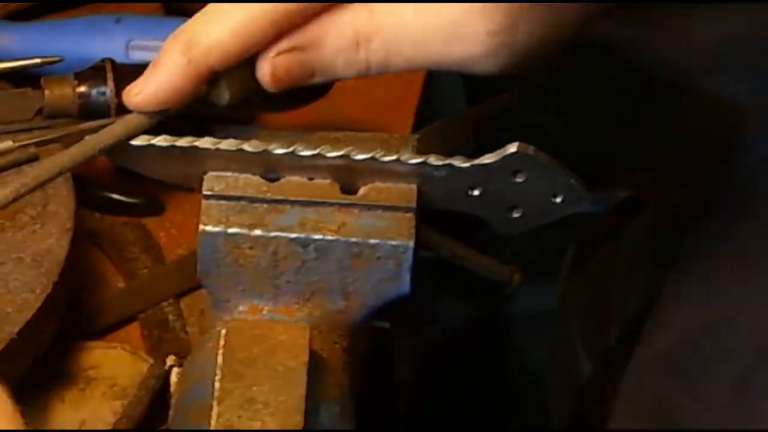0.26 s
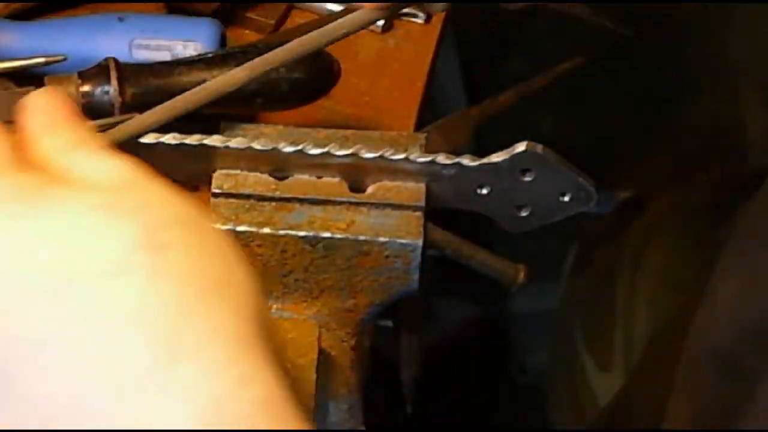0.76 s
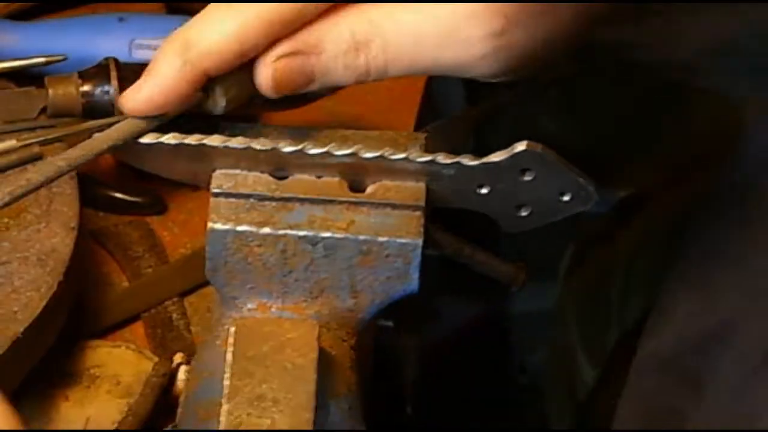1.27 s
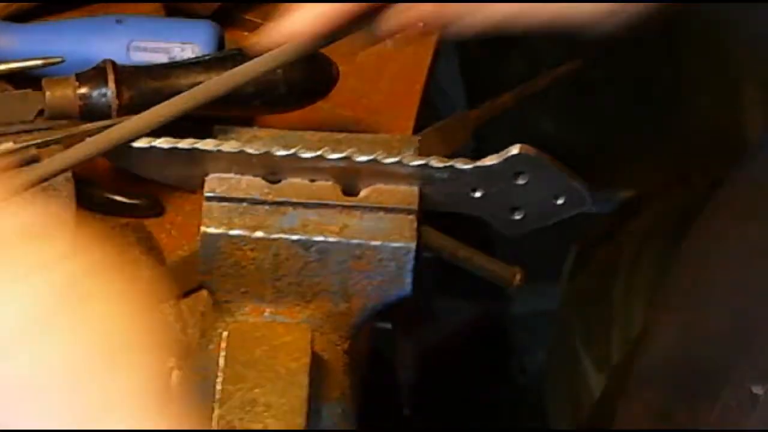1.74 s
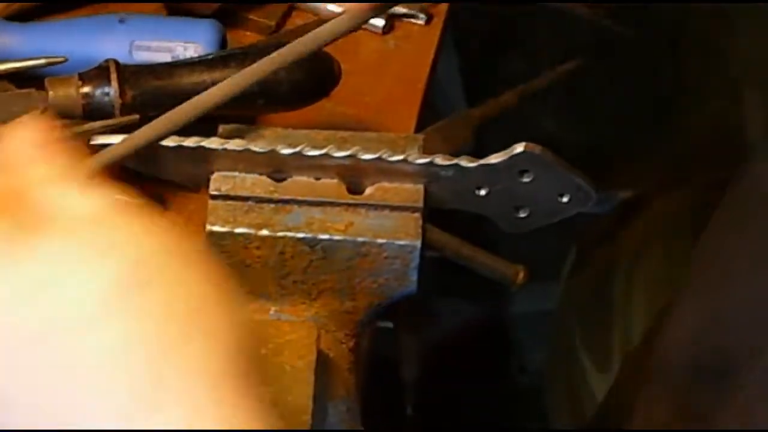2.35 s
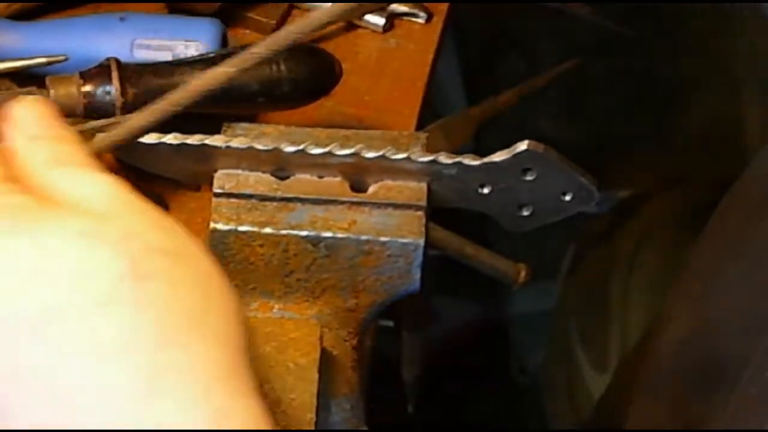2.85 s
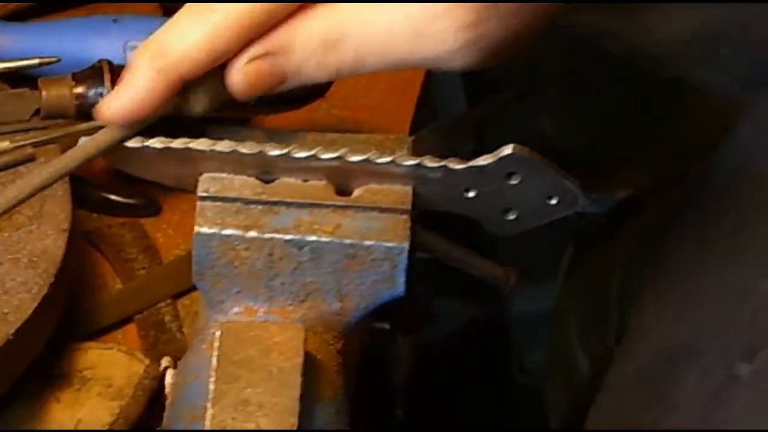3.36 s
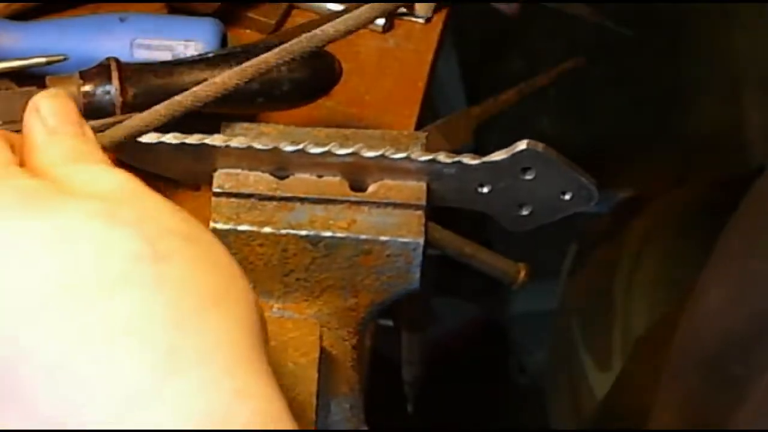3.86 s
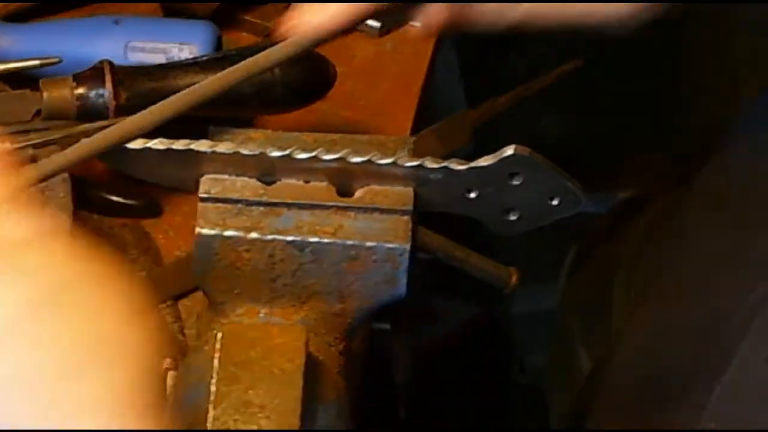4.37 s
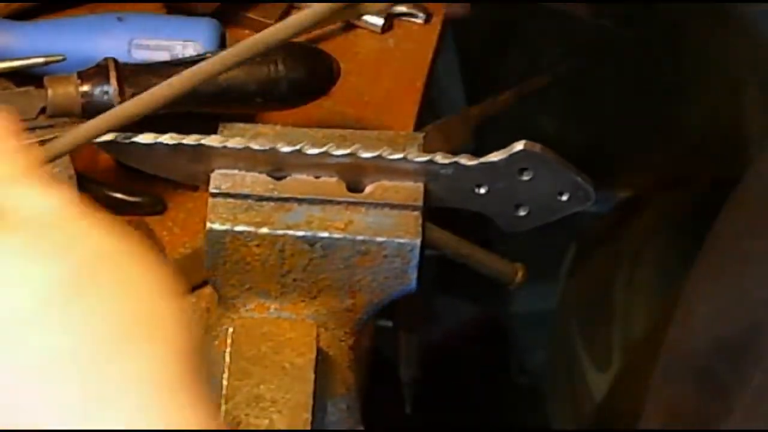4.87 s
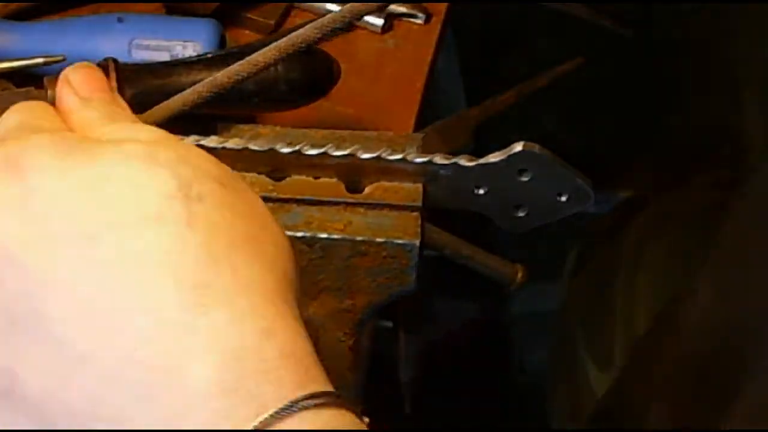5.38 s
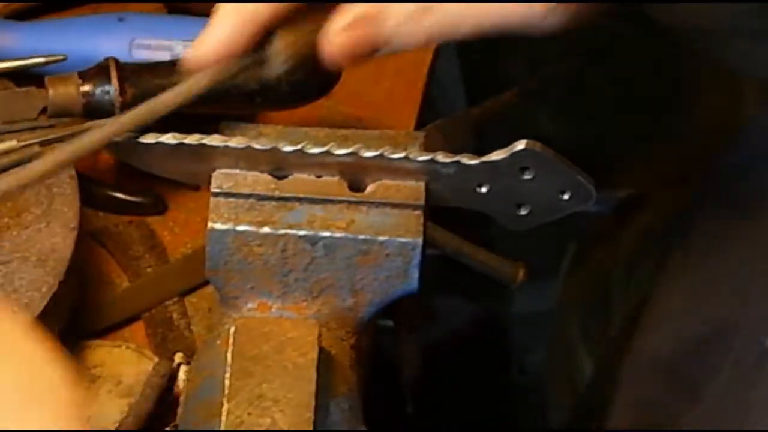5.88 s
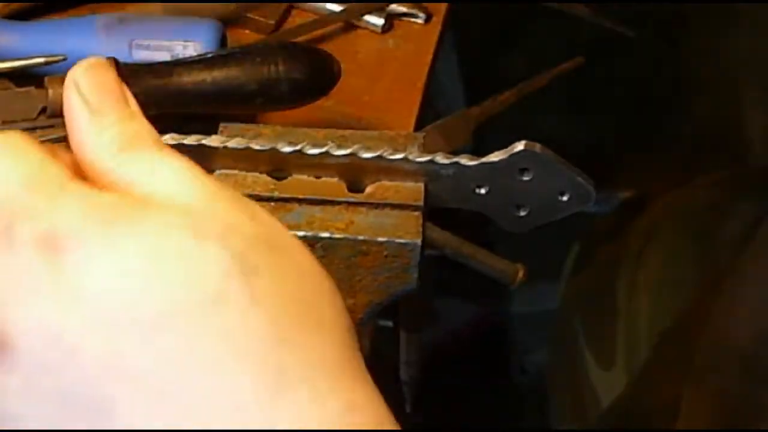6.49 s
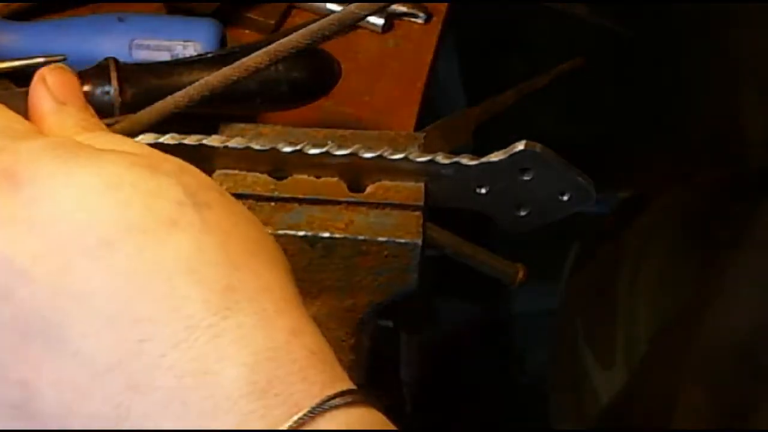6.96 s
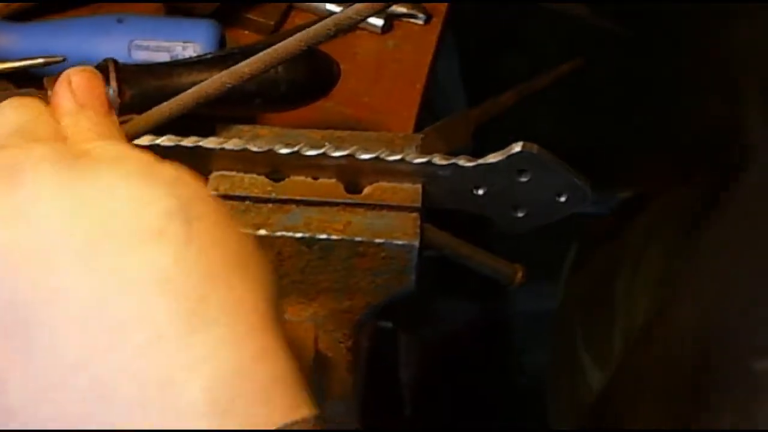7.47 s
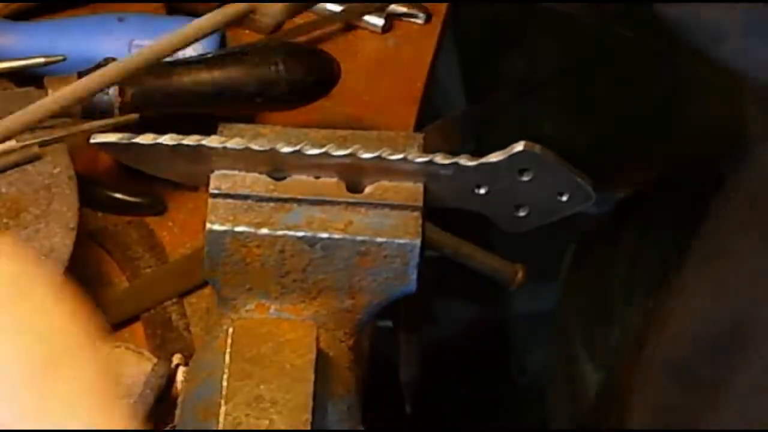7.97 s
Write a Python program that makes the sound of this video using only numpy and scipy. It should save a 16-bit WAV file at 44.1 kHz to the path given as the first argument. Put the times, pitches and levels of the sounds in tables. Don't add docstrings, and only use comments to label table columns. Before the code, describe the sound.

Gritty metal filing in a small workshop, hard cutting scrapes and lighter returns, faint taps between, then a clacking double knock and more rasping.

```python
import sys
import numpy as np
from scipy import signal
from scipy.fft import rfft, irfft, next_fast_len
from scipy.io import wavfile

SR = 44100
rng = np.random.default_rng(int(sys.argv[2]) if len(sys.argv) > 2 else 0)


def elevation(decibels):
    levels = np.asarray(decibels, float)
    return 10 ** (levels / 20)


def unload_audio(sound):
    columns = np.transpose(np.atleast_2d(sound))
    steps = np.round(np.clip(columns, -1, 1) * 32767)
    wavfile.write(sys.argv[1], SR, steps.astype(np.int16))


N = 362943


def rms_one(x):
    return x / np.sqrt(np.mean(x ** 2) + 1e-20)


def drift(rate_hz):
    r = np.exp(-80 * np.pi * rate_hz / SR)
    noise = rng.standard_normal(N // 40 + 1002)
    slow = signal.lfilter([1], [1, -2 * r, r * r], noise)[1000:]
    return np.interp(np.arange(N) / 40, np.arange(len(slow)), rms_one(slow))


def resonate(x, hz, width_hz):
    r = np.exp(-np.pi * width_hz / SR)
    poles = [1, -2 * r * np.cos(2 * np.pi * hz / SR), r * r]
    return signal.lfilter(np.array([1, 0, -1]) * (1 - r * r) / 2, poles, x)


def ring(clicks, hz, t60_s):
    r, w = elevation(-60 / (t60_s * SR)), 2 * np.pi * hz / SR
    return signal.lfilter([0, np.sin(w)], [1, -2 * r * np.cos(w), r * r], clicks + 1e-18)


def clicks_at(times_s, sizes):
    out = np.zeros(N)
    out[(np.asarray(times_s) * SR).astype(int)] = sizes
    return out


# (frequency [Hz], width [Hz], level [dB rms])
HUM = [(33, 13, -52), (51.95, 2.87, -51), (93.3, 27, -69.5), (145, 9.9, -70.5)]
# (frequency [Hz], density [dB per Hz])
AIR = [(12, -11), (70, -18.5), (170, -32.5), (400, -34.5), (800, -37), (1400, -44), (2400, -44.5),
       (3900, -46)]
AIR_DB = -55.5
CONVERTER_RATE_HZ = 8000


def background():
    hum = 0
    for hz, width_hz, db in HUM:
        noise = rng.standard_normal(N + SR)
        band = resonate(resonate(noise, hz, width_hz), hz, width_hz)
        hum = hum + elevation(db) * rms_one(band[SR:])
    hz = np.fft.rfftfreq(N, 1 / SR) + 1
    air_hz, air_db = np.transpose(AIR)
    colour = elevation(np.interp(np.log(hz), np.log(air_hz), air_db)) * (hz < CONVERTER_RATE_HZ / 2)
    air = irfft(rfft(rng.standard_normal(N)) * colour, N)
    return hum + elevation(AIR_DB) * rms_one(air)


# (bite [s], swell [s], fade [s], blade level [dB], bench re blade [dB])
PUSHES = [
    (-0.1, 0.077, 0.19, -29.5, -5),
    (0.815, 0.11, 0.17, -32, -2),
    (1.51, 0.083, 0.14, -31, -5.5),
    (2.97, 0.16, 0.15, -30.5, -4.5),
    (4.07, .21, 0.16, -31, -1.5),
    (5.27, .18, 0.15, -32, -2.5),
    (7.3, 0.15, 0.18, -31.5, -2),
]
# (bite [s], swell [s], fade [s], blade level [dB], shank re blade [dB])
PULLS = [
    (0.25, 0.21, 0.3, -40.5, -2),
    (1.14, 0.074, 0.23, -34.5, -2.5),
    (1.78, 0.076, 0.21, -34.5, -1.5),
    (2.11, 0.08, 0.14, -37, -4),
]
# (touch [s], swell [s], fade [s], blade level [dB], file re blade [dB])
DRAGS = [(1.32, 0.025, 0.1, -43, -3.5), (1.97, 0.034, .09, -49, -13), (2.3, 0.11, 0.18, -56.5, -10),
         (2.54, 0.035, 0.067, -62, -22), (2.67, 0.099, 0.11, -50, -10.5), (3.29, 0.036, 0.11, -42, -11),
         (3.47, 0.03, 0.18, -56, -8), (3.66, 0.17, 0.13, -48.5, -15), (4.4, 0.093, 0.1, -48, -11.5),
         (4.64, 0.037, 0.065, -63.5, -2.5), (4.82, 0.069, 0.11, -58, -10), (5.09, 0.021, 0.04, -61, -24),
         (5.65, 0.052, 0.1, -47.5, -12), (5.76, 0.11, 0.082, -55, -12), (6.53, 0.028, .05, -62, -2),
         (6.62, .07, 0.14, -53.5, -18), (6.85, 0.052, 0.16, -63, -9), (7.62, 0.045, .17, -55, -7),
         (7.8, 0.089, 0.088, -56.5, -7), (8.012, 0.058, 0.15, -48.5, -11),
         (8.11, 0.034, 0.071, -47.5, -5.5)]
PUSH = dict(drop_bite_db=20.5, drop_fade_db=18.5, bench_db=-2, shank_db=-17, hiss_db=-14.5, pressure=0.68, law=2)
PULL = dict(drop_bite_db=10, drop_fade_db=24.5, bench_db=-6.5, shank_db=-1.5, hiss_db=-13, pressure=1, law=1.57)
DRAG = dict(drop_bite_db=11.5, drop_fade_db=20, bench_db=-11, shank_db=0, hiss_db=-1, pressure=0.76, law=1.34)
LANDING_DB_PER_S = 499


def contacts(follows, lag_s, share):
    t, power = np.arange(0, N + 64, 64) / SR, 1e-12
    for rows, kind in ((PUSHES, PUSH), (PULLS, PULL), (DRAGS, DRAG)):
        law = kind["law"]
        for start_s, swell_s, fade_s, db, row_db in rows:
            late_s = t - lag_s - start_s - swell_s
            rise, fall = kind["drop_bite_db"] / swell_s ** law, kind["drop_fade_db"] / fade_s ** law
            down_db = np.where(late_s < 0, rise, fall) * np.abs(late_s) ** law
            aloft_db = LANDING_DB_PER_S * np.maximum(start_s - t, 0)
            power = power + elevation(2 * (db - follows * down_db - aloft_db)) * share(kind, row_db)
    return np.interp(np.arange(N) / 64, np.arange(len(t)), power)


def teeth(per_s, spread_db, judder_db):
    sizes = elevation(spread_db * np.minimum(rng.exponential(1, N), 4)) * rng.choice([-1, 1], N)
    return sizes * (rng.random(N) < per_s / SR) * elevation(judder_db * drift(90.0))


def body(force, modes, wander_db):
    out = 0
    for k, (hz, width_hz, db) in enumerate(modes):
        push = force * elevation(wander_db * drift(7.7))
        out = out + (-1) ** k * elevation(db) * resonate(push, hz, width_hz)
    return rms_one(out)


BENCH = [(96.6, 24, -3.5), (152.1, 29.2, 0), (231, 20, -4), (273.5, 51, -8.5), (400.8, 23, -7.5)]
BLADE = [(506.3, 65, -3.5), (595, 32, -5), (667, 43, -10), (765.5, 19, 4.5), (911, 20, -26.5),
         (1028, 34.3, 1), (1150, 50, -21.5), (1303, 7.2, -4.5), (790, 460, -6.5)]
BLADE_FREE = [(799.3, 76, 2), (887, 48, -4.5), (1039, 120, -17.5), (610, 130, -3.5)]
FILE_BODY = [(1795, 58, -9), (1760, 80, 0.5), (1917, 51, 2.5), (2050, 15, -14.5), (2183, 11, 2),
             (2110, 910, -4)]
FILE_SING = [(1806, 190, 0), (1897, 77, 2.5)]
TOOTH_HISS = [(2498, 31, 9.5), (2655, 52, 3.5), (3052, 160, 8), (3484, 360, -0.5), (3844, 54, -2.5),
              (2870, 820, -4)]
FILE_TIP = [(2497, 160, 2.5), (2776, 37, 0), (2930, 240, -5)]
BENCH_FOLLOWS, TEETH_FOLLOW, SING_FOLLOWS = 0.77, 1.01, 1.65
BENCH_LAG_S, SING_LAG_S = 0.012, 0.034
TEETH_LEAD_S = 0.015
FREEING = 1.2
CHATTER_DB = 5


def scrape():
    def bench_share(kind, row_db):
        return elevation(2 * (kind["bench_db"] + row_db * (kind is PUSH)))

    def singing_share(kind, row_db):
        return elevation(2 * (kind["shank_db"] + row_db)) * (kind is PULL)

    def shank_share(kind, row_db):
        return elevation(2 * (kind["shank_db"] + row_db * (kind is DRAG))) * (kind is not PULL)

    def hiss_share(kind, row_db):
        return elevation(2 * (kind["hiss_db"] + row_db * (kind is DRAG)))

    level = contacts(1, 0, lambda kind, row_db: 1)
    freed = contacts(FREEING, 0, lambda kind, row_db: 1 - kind["pressure"])
    pressure = np.clip(1 - freed / level, 0, 1)
    hard = np.clip((10 * np.log10(level) + 54) / 14, 0.3, 1)
    bench_gain = np.sqrt(contacts(BENCH_FOLLOWS, BENCH_LAG_S, bench_share))
    singing = contacts(SING_FOLLOWS, SING_LAG_S, singing_share)
    shank_gain = np.sqrt(singing + contacts(TEETH_FOLLOW, -TEETH_LEAD_S, shank_share))
    hiss_gain = np.sqrt(contacts(TEETH_FOLLOW, -TEETH_LEAD_S, hiss_share))

    force = teeth(per_s=3000.0, spread_db=2.5, judder_db=1.2)
    force = force * elevation(CHATTER_DB * (1 - hard) * drift(15.0))
    blade = np.sqrt(pressure) * body(force, BLADE, wander_db=1.2)
    blade = blade + np.sqrt(1 - pressure) * body(force, BLADE_FREE, wander_db=1.6)
    shank = np.sqrt(hard) * body(force, FILE_BODY, wander_db=-1.5)
    shank = shank + np.sqrt(1 - hard) * body(force, FILE_SING, wander_db=1.5)
    hiss = np.sqrt(hard) * body(force, TOOTH_HISS, wander_db=1.5)
    hiss = hiss + np.sqrt(1 - hard) * body(force, FILE_TIP, wander_db=9.0)

    low = np.sqrt(level) * blade + bench_gain * body(force, BENCH, wander_db=1.5)
    high = shank_gain * shank + hiss_gain * hiss
    low = signal.sosfilt(signal.butter(2, 1300.0, fs=SR, output="sos"), low)
    high = signal.sosfilt(signal.butter(2, 1400.0, "high", fs=SR, output="sos"), high)
    return low + high


def crack(times_s, peak_db, t60_s, hz, width_hz):
    clicks = clicks_at(times_s, elevation(peak_db)) + 1e-18
    burst = signal.lfilter([1], [1, -elevation(-60 / (t60_s * SR))], clicks)
    return resonate(resonate(burst * rng.standard_normal(N), hz, width_hz), hz, 1.3 * width_hz)


# (time [s], peak level [dB], favoured blade pitch [Hz])
TICKS = [(0.253, -29.5, 745), (0.299, -29, 727), (0.363, -35, 610), (0.581, -33, 810), (0.635, -42, 1200),
         (1.328, -36, 697), (0.686, -32.5, 810), (3.322, -38, 990), (2.675, -35, 830), (3.73, -36.5, 840),
         (3.882, -39.5, 1000), (4.072, -52, 797), (4.473, -42, 830), (5.104, -55.5, 796), (5.843, -45, 694),
         (5.927, -46.5, 680), (6.553, -43, 785), (6.681, -46, 820)]
# (time [s], peak level [dB], favoured blade pitch [Hz])
BUMPS = [(3.59, -43.5, 627), (0.814, -37, 1017), (1.507, -34, 940), (2.121, -36.5, 690),
         (2.559, -38.5, 910), (2.967, -50, 1040), (2.997, -33.5, 781), (4.36, -30, 800),
         (3.487, -41.5, 614), (3.664, -35, 743), (5.238, -43, 490), (5.352, -28, 1020), (5.455, -23, 765),
         (5.684, -39.5, 581), (5.86, -47, 1303), (4.96, -49, 805), (6.751, -44, 775), (6.848, -43.5, 837),
         (7.659, -51, 622), (7.859, -45, 993), (8.011, -28.5, 860), (8.039, -30, 870), (8.074, -40, 851),
         (8.131, -53, 818), (8.153, -35, 790)]
# (time [s], peak level [dB], favoured blade pitch [Hz])
SNAGS = [(0.444, -24, 754), (1.239, -25, 620), (1.331, -33, 525), (1.865, -34, 795), (3.808, -49, 810),
         (3.842, -48.5, 820), (4.828, -44.5, 850), (4.865, -46, 850), (6.886, -45.5, 780),
         (0.405, -28, 803)]
# (shank re peak [dB], tip re peak [dB])
TICK, BUMP, SNAG = (-14.5, -5), (-21.5, -12.5), (-6, -17.5)


def taps():
    kinds = ((TICKS, TICK), (BUMPS, BUMP), (SNAGS, SNAG))
    touches = [(*row, *kind) for rows, kind in kinds for row in rows]
    times_s, peak_db, pitch_hz, shank_db, tip_db = np.transpose(touches)
    rattle = rng.choice([-1, 1], N) * (rng.random(N) < 0.03)
    fade = elevation(-60 / (0.03 * SR))
    out = crack(times_s, peak_db + tip_db + 3.5, t60_s=0.03, hz=2900.0, width_hz=1200.0)
    strengths = [(mode, -11 - 30 * np.abs(np.log2(mode[0] / pitch_hz))) for mode in BLADE[:-1]]
    strengths += [(mode, mode[2] + shank_db - 7) for mode in FILE_SING]
    strengths += [(mode, mode[2] + tip_db - 17) for mode in FILE_TIP]
    for k, ((hz, width_hz, _), db) in enumerate(strengths):
        clicks = clicks_at(times_s, elevation(peak_db + db)) + 1e-18
        touch = signal.lfilter([1], [1, -fade], clicks)
        out = out + ring(touch * np.roll(rattle, 999 * k), hz, min(3.0 / width_hz, 0.07))
    return out


# (time [s], peak level [dB])
KNOCK_A = [
    (5.983, -24.5),
    (5.986, -28),
    (5.989, -17.5),
    (5.992, -23.5),
    (6.003, -23.5),
    (6.012, -29.5),
]
# (time [s], peak level [dB])
KNOCK_B = [
    (6.2015, -21.5),
    (6.205, -24),
    (6.209, -39),
    (6.224, -52),
]
# (frequency [Hz], level [dB], t60 [s])
RING_A = [(810, 2.5, 0.16), (1054, -15, 0.087), (1220, -4, 0.27), (1870, -7.5, 0.17), (2340, -2, 0.16),
          (2700, -5, 0.1), (2530, -7, 0.23), (2760, -2.5, 0.15), (2870, -4, 0.16), (2910, -6, 0.11),
          (3300, -7, .1), (3550, -17.5, 0.3)]
# (frequency [Hz], level [dB], t60 [s])
RING_B = [(603, -13, 0.83), (818, 2.5, 0.13), (1980, -8.5, 0.15), (2310, -4, 0.035), (2730, -23.5, 0.42),
          (3230, -26, 0.32), (3575, -27, 0.27), (3530, -2, 0.099)]
# (frequency [Hz], width [Hz], level [dB], t60 [s])
CRACK = [(196, 630, -8.5, 0.1), (832, 340, -0.5, 0.098), (1858, 150, -2, 0.028), (2600, 750, 5.5, 0.019),
         (3470, 730, -1.5, 0.024)]


def knock(hits, modes, ring_db, crack_db):
    times_s, peak_db = np.transpose(hits)
    strikes = rng.uniform(0.74, 1, (len(modes), 8))[:, :len(hits)]
    out = 0
    for (hz, db, t60_s), strike in zip(modes, strikes):
        clicks = clicks_at(times_s, elevation(peak_db + db + ring_db) * strike)
        out = out + ring(clicks, hz, 0.45 * min(t60_s, 0.3))
    for hz, width_hz, db, t60_s in CRACK:
        out = out + crack(times_s, peak_db + crack_db + db, t60_s, hz, width_hz)
    return out


def workshop(x):
    size = next_fast_len(N + SR)
    hz = np.fft.rfftfreq(size, 1 / SR)
    t60_s = 0.3 / (1 + hz / 21000.0)
    response = 0
    for k, lag_s in enumerate(rng.uniform(0.013, 0.035, 16)):
        trip = elevation(-60 * lag_s / t60_s) * np.exp(-2j * np.pi * hz * lag_s)
        response = response + (-1) ** k * trip / (1 - trip)
    return irfft(rfft(x, size) * response, size)[:N]


def scene():
    blows = taps()
    blows = blows + knock(KNOCK_A, RING_A, ring_db=-13.5, crack_db=-2.0)
    blows = blows + knock(KNOCK_B, RING_B, ring_db=-16.5, crack_db=4.5)
    return (scrape() + blows + elevation(-18.0) * workshop(blows) + background())[None]


def low_pass(x):
    return signal.sosfilt(signal.butter(12, 15710, fs=SR, output="sos"), x)


# (time [s], level [dB])
GLITCH = [
    (5.99078, -19),
    (5.99094, -18.5),
    (5.99153, -21),
]


def record(dry):
    steep = signal.ellip(9, 0.5, 60, 3900, fs=SR, output="sos")
    led_in = np.hstack([dry[:, 400:0:-1], dry])
    narrow = signal.sosfilt(steep, led_in)[:, 400:] + 0.0012
    turn = 2 * np.pi * CONVERTER_RATE_HZ * np.arange(N) / SR
    mirror = narrow * np.cos(turn)
    near = signal.sosfilt(signal.butter(4, 9000.0, fs=SR, output="sos"), mirror)
    skirt = signal.sosfilt(signal.butter(3, 4300.0, fs=SR, output="sos"), mirror)
    images = elevation(-72) * near + elevation(-36) * skirt + elevation(-73.0) * narrow * np.cos(2 * turn)
    slip_s, slip_db = np.transpose(GLITCH)
    slips = clicks_at(slip_s, elevation(slip_db) * [1, -1, 1])
    hiss = elevation(-97.5) * rng.standard_normal(N)
    return low_pass(narrow + images + slips + hiss)


dry = scene()
out = record(dry)
unload_audio(out)
```